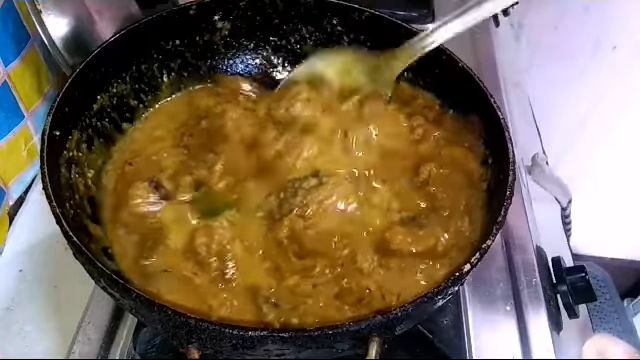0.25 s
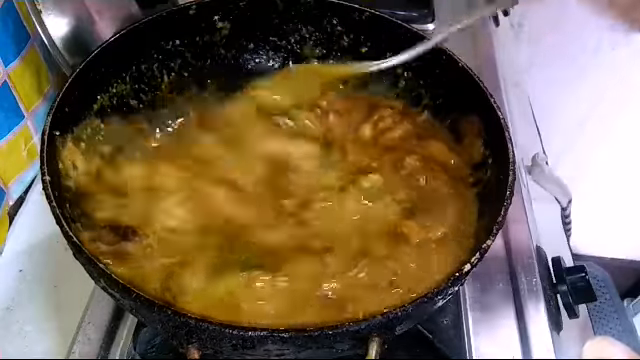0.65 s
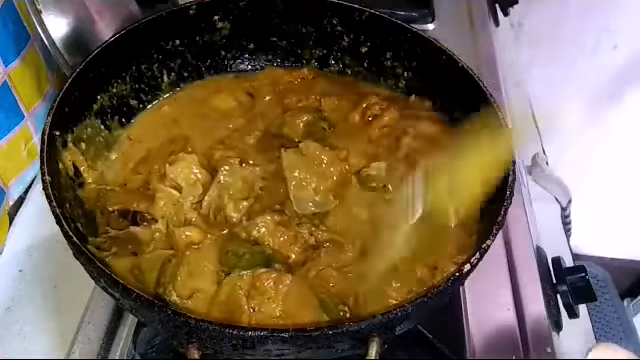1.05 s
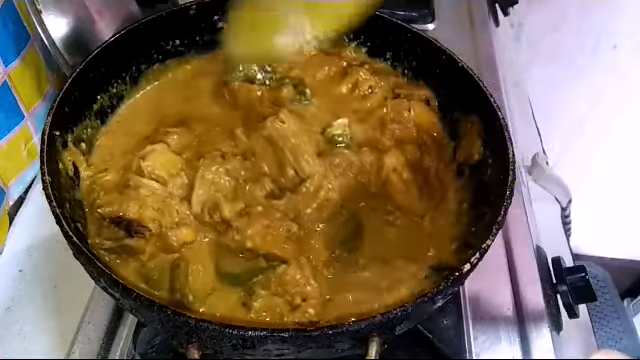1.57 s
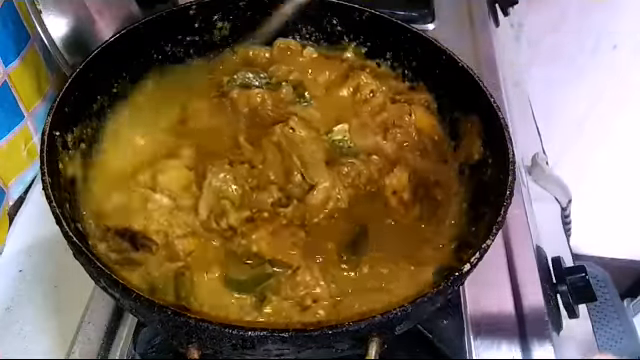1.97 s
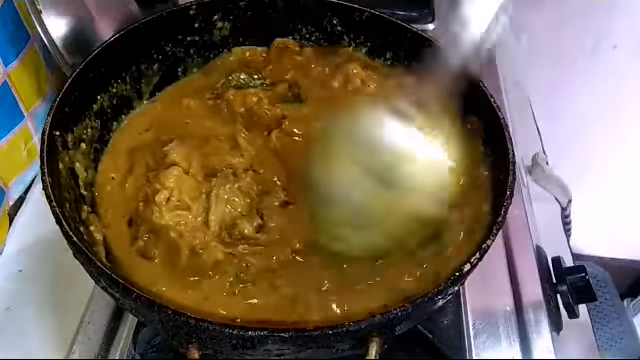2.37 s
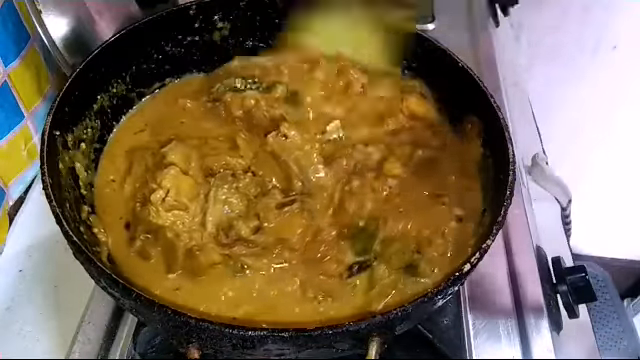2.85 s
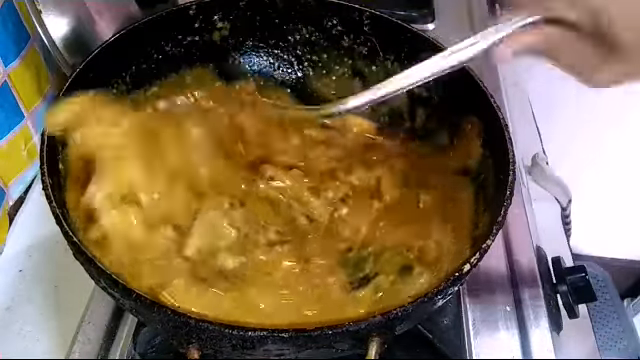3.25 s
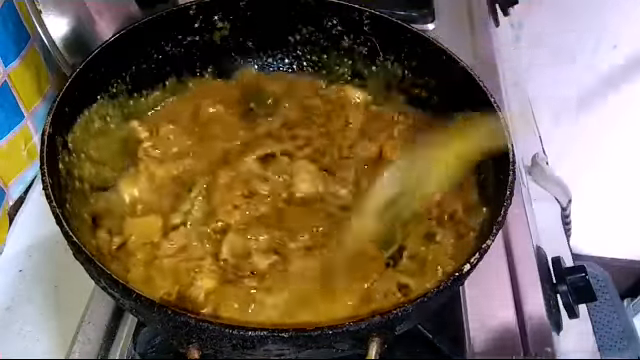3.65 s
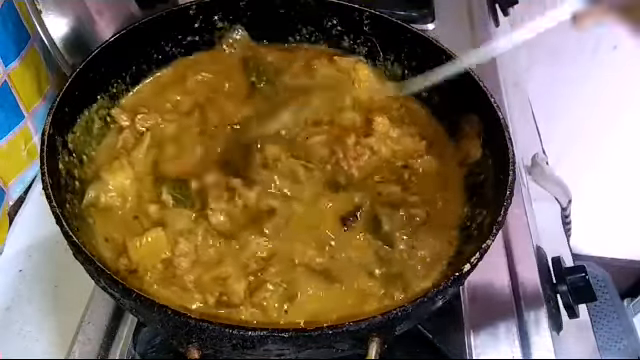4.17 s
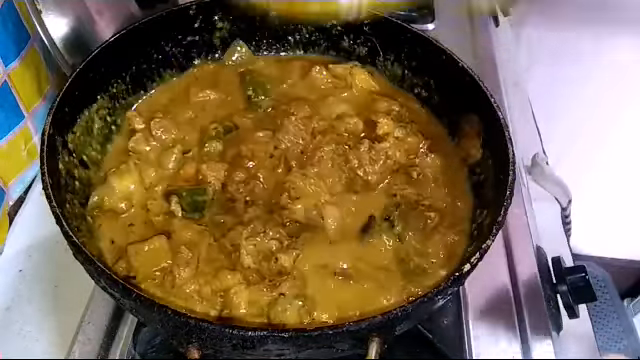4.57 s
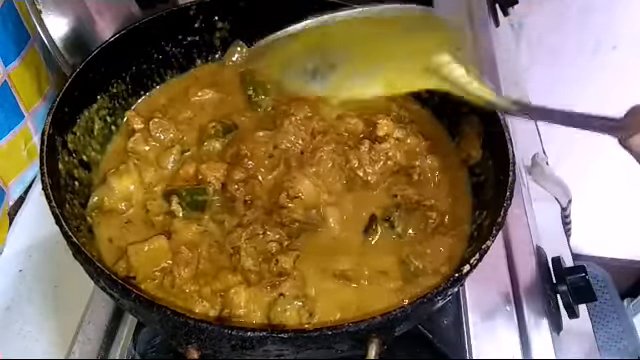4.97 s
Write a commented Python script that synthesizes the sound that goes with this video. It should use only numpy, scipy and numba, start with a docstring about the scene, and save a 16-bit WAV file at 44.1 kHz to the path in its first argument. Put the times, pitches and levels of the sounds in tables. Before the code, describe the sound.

A steel spoon stirs thick curry in a nonstick pan on a gas stove. A light clink comes first, then short bursts of gritty, wet scraping separated by squelches, plops and soft sizzling. A sharp slap lands in the gravy near four seconds, and two loud, clanging rim knocks close it. Heard close from above in a small, hard-walled kitchen with a short reverberation.

```python
"""Stirring thick curry on a gas stove

A steel spoon stirs thick curry in a nonstick pan, heard from just above in a small tiled kitchen.
Stick-slip friction drives the scrapes: each slip shakes the pan and rasps the edge; pressure squeezes gravy.
Air pockets ring as damped bubbles, steam fizzes as a dense swarm of them, and filtered noise is the flame.
Blows excite the modes of spoon, pan and stove; at the end the spoon is knocked twice on the rim."""
import sys
import numpy as np
from scipy import signal
from scipy.fft import rfft, irfft
from scipy.io import wavfile
from numba import njit

SR = 44100
rng = np.random.default_rng(int(sys.argv[2]) if len(sys.argv) > 2 else 0)


def inscribe(sig):
    """Save sig as 16-bit PCM at rate SR to the path in sys.argv[1].

    A 1-D sig is mono; a 2-D sig holds one channel per row.
    Samples are clipped to [-1, 1] before scaling.
    """
    pcm = np.round(np.clip(np.atleast_2d(sig).T, -1, 1) * 32767)
    wavfile.write(sys.argv[1], SR, pcm.astype(np.int16))


N = 230005

# modes of the pan: (frequency [Hz], relative level [dB])
PAN_MODES = [(452, -3.5), (628, 5), (756, 5.5), (962, 11), (1019, 7.5), (1190, -5), (1265, -5), (1325, -1),
             (1522, 1), (1998, -4), (4300, -6), (5230, -9.5)]


def undb(db):
    """Logarithmic levels: decibels become an amplitude gain."""
    return 10 ** (np.asarray(db) / 20)


def unit(x):
    """Power normalisation: scale a sound to rms 1."""
    return x / np.sqrt(np.mean(x ** 2))


def unit_energy(x):
    """Energy normalisation: scale a response to energy 1."""
    return x / np.sqrt(np.sum(x ** 2))


def curves(rows):
    """Linear interpolation: the columns of a timed table, one value per sample."""
    s, *columns = np.transpose(rows)
    return [np.interp(np.arange(N) / SR, s, c) for c in columns]


def through(x, response):
    """Linear filtering: convolve a sound with an impulse response."""
    return signal.oaconvolve(x, response)[:N]


def add(out, s, sound):
    """Superposition: mix a sound in at time s."""
    i = max(int(s * SR), 0)
    out[i:i + len(sound)] += sound[:max(N - i, 0)]


def colour(points, size=2048):
    """Minimum phase: folding the cepstrum gives a causal response with the given spectrum."""
    hz, db = np.transpose(points)
    bins_hz = np.arange(size // 2 + 1) * SR / size
    gain = undb(np.interp(np.log(bins_hz + 1), np.log(hz), db))
    cepstrum = irfft(np.log(gain))
    cepstrum[1:size // 2] *= 2
    cepstrum[size // 2 + 1:] = 0
    return unit_energy(irfft(np.exp(rfft(cepstrum))))


def fade(t, t60):
    """Exponential damping: 60 dB down after t60."""
    return np.exp(-np.log(1000) * t / t60)


def ring(modes):
    """Modal superposition: damped sines, neighbours swinging in opposite senses."""
    t = np.arange(SR // 2) / SR
    total = np.zeros(len(t))
    for k, (hz, db, t60) in enumerate(modes):
        total += (-1) ** k * undb(db) * fade(t, t60) * np.sin(2 * np.pi * hz * t)
    return unit_energy(total)


def pan_ring(t60):
    """Modal damping: all the pan's modes die away at one given rate."""
    return ring([(hz, db, t60) for hz, db in PAN_MODES])


def wander(rate):
    """Band-limited chance: smooth noise changing about rate times a second, spread near 1."""
    values = rng.standard_normal(N // 20)
    return 1.1 * np.interp(np.arange(N) / SR * rate, np.arange(len(values)), values)


def clicks(rate, spread_db):
    """Random impulse process: rate clicks a second on average, of scattered sizes, rms 1."""
    present = rng.random(N) < rate / SR
    sign = rng.choice([-1, 1], N)
    size_db = spread_db * np.minimum(rng.exponential(size=N), np.pi)
    return unit(present * sign * undb(size_db))


def bubble(hz, cycles, glide, onset_cycles=.5):
    """Cavity resonance: an air pocket rings, 60 dB down after some cycles, rising in pitch as it opens."""
    t = np.arange(int(SR * cycles / hz) + 2) / SR
    age = t * hz / cycles
    onset = 1 - np.exp(-(t * hz / onset_cycles) ** 2)
    return fade(age, 1) * onset * np.sin(2 * np.pi * hz * t * (1 + glide * age))


def froth(centre_hz, octaves, spread_db, cycles, count):
    """Incoherent sum: a swarm of bubbles of scattered time, pitch and size, rms 1."""
    out = np.zeros(N)
    draws = zip(rng.random(count), rng.standard_normal(count), rng.exponential(size=count))
    for when, pitch, size in draws:
        hz = min(centre_hz * 2 ** (octaves * pitch), SR / np.pi)
        gain = undb(spread_db * min(size, np.pi))
        add(out, when * N / SR, gain * bubble(hz, cycles, glide=0.073, onset_cycles=1.5))
    return unit(out)


@njit
def resonate(x, hz, width):
    """State-variable resonance: a band-pass whose centre may move, gain 1 at the centre."""
    y, band, low = np.empty(len(x)), 0., 0.
    for i in range(len(x)):
        g, k = np.tan(np.pi * hz[i] / SR), width / hz[i]
        v = (band + g * (x[i] + 1e-18 - low)) / (1 + g * (g + k))
        band, low, y[i] = 2 * v - band, low + 2 * g * v, k * v
    return y


def swell(start, rise, hold, release, range_db=26):
    """Pressure envelope: climbs range_db over the rise, holds, drops range_db over the release."""
    t = np.arange(N) / SR - start
    return undb(-range_db * (np.maximum(-t, 0) / rise + np.maximum(t - hold, 0) / release))


def burner():
    """Turbulent combustion: the flame flutters under the pan as low, coloured noise."""
    # flutter spectrum: (frequency [Hz], level [dB per Hz])
    flutter = [(20, -19), (45, -11.5), (70, 4), (97, 2.5), (125, -3.5), (145, -8.5), (200, -20.5),
               (350, -15.5), (700, -26), (2000, -56)]
    # strength of the flutter: (time [s], relative level [dB])
    flame = [(0, -75), (.13, -66), (.65, -65), (.98, -60.5), (1.5, -62), (1.8, -75), (2.85, -72),
             (3.85, -62.5), (4.35, -77), (4.67, -57), (4.8, -66)]
    level_db, = curves(flame)
    return through(rng.standard_normal(N), colour(flutter)) * undb(level_db - 1)


def gravy_levels(rise_s=.015, settle_s=.04, flare_db=11, flare_s=.25):
    """Surface cooling: a wave squelches while it moves; its sizzle flares, then sinks as the metal cools."""
    # gravy pushed over hot metal:
    # (start [s], length [s], relative sizzle level [dB], relative squelch level [dB])
    waves = [(0, .17, -66.5, -61), (.36, .3, -56, -60), (.74, .27, -62.5, -63.5), (1.2, .22, -64.5, -66),
             (1.43, .08, -52, -62), (1.52, .34, -58.5, -66), (1.97, .53, -58.5, -58), (3.08, .6, -55, -62),
             (3.7, .3, -69, -66), (4.06, .08, -59, -64), (4.28, .46, -59.5, -63), (4.77, .45, -61, -61)]
    t = np.arange(N) / SR
    steam, wet = undb(-76.5), undb(-69.5)  # gravy at rest
    for s, length, sizzle, squelch in waves:
        age = np.maximum(t - s, 0)
        settling = np.exp(-np.maximum(age - length, 0) / settle_s)
        moving = (1 - np.exp(-age / rise_s)) * settling
        cooling_db = flare_db * (1 - np.exp(-age / flare_s))
        steam = np.hypot(steam, moving * undb(sizzle - cooling_db))
        wet = np.hypot(wet, moving * undb(squelch))
    return 20 * np.log10([steam, wet])


def simmering(squelch_db=-3, sizzle_db=-2.5, cluster_db=2.0, spit_db=-8):
    """Bubble acoustics: low pockets squelch in clusters; steam fizzes and spits on bare metal."""
    # fizz spectrum: (frequency [Hz], level [dB per Hz])
    sizzle = [(1500, 4), (2400, 2.5), (3200, -6.5), (4300, 1.5), (5300, 2.5), (6500, -3.5), (8000, -2),
              (10000, -12), (14000, -48)]
    steam_db, wet_db = gravy_levels()
    pockets = froth(centre_hz=930, octaves=0.33, spread_db=2.3, cycles=22, count=950)
    small = froth(centre_hz=1880, octaves=0.22, spread_db=3.2, cycles=30, count=700)
    pockets = pockets + undb(-7.5) * small
    swarm = froth(centre_hz=4580, octaves=0.633, spread_db=2, cycles=29.4, count=8000)
    fizz = unit(through(swarm, colour(sizzle)))
    spits = froth(centre_hz=5100, octaves=.12, spread_db=3, cycles=70, count=260)
    steam = (fizz + undb(spit_db) * spits) * undb(steam_db + sizzle_db + 2 * wander(rate=22))
    return pockets * undb(wet_db + squelch_db + cluster_db * wander(rate=28)) + steam


def plopping(snap_db=-5):
    """Damped cavity resonance: pockets burst with a snap and a ring, a few tiny high ones spitting like fizz."""
    # pockets opening, and at 4.056 s the spoon slapping down close by:
    # (time [s], relative peak level [dB], starting pitch [Hz], ring length [cycles])
    bursts = [(0.033, -42.5, 834, 17), (0.917, -35.5, 1440, 19), (1.422, -37, 612, 37),
              (1.533, -35, 4960, 33), (2.65, -47, 910, 20), (2.794, -50, 5180, 130), (2.809, -50, 2010, 26),
              (2.897, -48, 600, 25), (3.076, -34, 2010, 45), (3.333, -45, 990, 38),
              (3.617, -42.5, 1035, 32), (3.67, -32.5, 947, 11), (3.708, -44.5, 860, 19),
              (3.733, -46, 5700, 90), (3.896, -49, 915, 53), (3.905, -47, 2020, 38), (3.947, -53, 1890, 36),
              (4.006, -43, 1500, 16), (4.02, -40, 1950, 19), (4.0562, -18, 1620, 6.4),
              (4.245, -50, 900, 24), (4.302, -46, 1000, 24), (4.37, -45, 1950, 30), (4.39, -45, 800, 22),
              (4.435, -38, 807, 20), (4.613, -39, 755, 17), (4.646, -46, 2300, 45),
              (4.791, -39.5, 820, 15.6), (4.848, -43, 840, 24)]
    out = np.zeros(N)
    for s, db, hz, cycles in bursts:
        add(out, s, undb(db) * bubble(hz, cycles, glide=0.05))
        add(out, s, undb(db + snap_db) * bubble(1.55 * hz, cycles=3.6, glide=0.12))
    return out


def chatter(t60, tail_db, bite_t60=0.016):
    """Contact noise: a few milliseconds of hard contact, then a dense, quickly dying buzz."""
    t = np.arange(SR // 4) / SR
    bite = unit_energy(rng.standard_normal(len(t)) * fade(t, bite_t60))
    buzz = unit_energy(rng.standard_normal(len(t)) * fade(t, t60))
    return unit_energy(bite + undb(tail_db) * buzz)


def bounces(span_s=.06, count=12):
    """Repeated impact: one blow, then the spoon skips on with lighter, unevenly timed touches."""
    out = np.zeros(SR // 4)
    when = rng.random(count)
    touch = (when * span_s * SR).astype(int)
    out[touch] = .35 * np.exp(-when) * rng.choice([-1, 1], count)
    out[0] = 1
    return unit_energy(out)


def knocking(body_db=-2, pan_db=-4, clink_db=-1, spoon_db=-3, thud_db=-5, rim_db=-3):
    """Impact excitation: a blow rattles spoon on pan, rings both and rocks the pan on its grate."""
    # steel on pan: (time [s], then relative levels [dB] of pan body, contact clink, spoon ring,
    # stove thud, rattle, rim ring)
    blows = [(0.197, -12, -8, -4.5, -12, 8, -17), (2.217, -15, -21, -30, -42, 2, -32),
             (2.256, -17, -45, -47, -41, 2, -30), (4.057, -19, -27, -38, -42, -2, -42),
             (4.9255, -1.5, -2.5, -14, -8, 5, -6), (4.955, -4, -9, -17, -11, 15, -11),
             (4.9605, -9, -16, -30, -20, -2, -14), (4.969, -10, -20, -30, -20, 0, -20),
             (4.9915, -5.5, -12, -22, -7, 7, -16), (5.102, -1, -4.5, -37, -9, 0, -7.5),
             (5.113, -10, -19, -37, -22, 2, -17), (5.127, -11, -18, -37, -20, -4, -22),
             (5.15, -8, -21, -25.5, -10, 5, -18), (5.168, -12, -26, -37, -16, 0, -26)]
    # contact spectra of body and clink: (frequency [Hz], level [dB per Hz])
    body_colour = [(40, -10), (150, -22), (350, -11), (550, -10), (750, 2.5), (1100, 2), (1600, 0),
                   (1880, -16), (2250, -10), (2550, -16), (3000, -11), (3500, -17), (4200, -17),
                   (8000, -57)]
    clink_colour = [(500, -15.5), (2800, -19), (3500, -27), (4300, -5.5), (5300, -2), (6300, -6.5),
                    (7500, -21), (9500, -22), (12000, -28), (14000, -39)]
    # modes of spoon, spoon-choked rim, and pan on grate: (frequency [Hz], relative level [dB], t60 [s])
    spoon_modes = [(1453, -13, .12), (1660, -16, .05), (2530, -10, .09), (2772, -9, .09), (2950, -11, .07),
                   (3950, -17, .07), (4400, -12, .05), (5001, 1, .13), (5071, -1, .11), (5230, -4, .11),
                   (5329, -6, .07), (6008, -3, .05), (6153, -6, .05), (6471, -14, .08), (6853, -12, .1),
                   (7950, -2, .1), (7985, -9, .07), (10990, -17, .09), (11950, -21, .09), (12560, -24, .1),
                   (13450, -23, .09)]
    rim_modes = [(1540, -11, .1), (2180, -15, .09), (2320, -14, .1), (2902, -15, .12), (4172, -5, .08),
                 (4300, 0, .09), (4689, -7, .08), (5195, -2, .08), (5330, 3, .045), (5650, 1, .03),
                 (5830, -1, .03), (6300, -6, .03)]
    stove_modes = [(96, 2.5, 0.88), (144, 2, 0.26), (200.5, 1, 0.19), (300, 1, .16), (452, 2.5, .22)]
    push, clink, strike, spoon, rock, rim = np.zeros((6, N))
    for s, body, contact, steel, thud, rattle, edge in blows:
        add(push, s, undb(body) * chatter(t60=0.15, tail_db=rattle))
        add(clink, s, undb(contact) * chatter(t60=0.14, tail_db=rattle - 8.5))
        add(strike, s, undb([body]))
        add(spoon, s, undb(steel) * bounces())
        add(rock, s, undb([thud]))
        add(rim, s, undb([edge]))
    out = undb(body_db) * through(push, colour(body_colour))
    out += undb(clink_db) * through(clink, colour(clink_colour))
    out += undb(pan_db) * through(strike, pan_ring(.24))
    out += undb(spoon_db) * through(spoon, ring(spoon_modes))
    out += undb(rim_db) * through(rim, ring(rim_modes))
    return out + undb(thud_db) * through(rock, ring(stove_modes))


def spoon_forces(dulling_db_per_s=45):
    """Contact forces: pressure on the pan, load on its floor and bite of the edge."""
    # strokes along the floor: (full pressure at [s], rise [s], hold [s], release [s],
    # relative level [dB], relative floor groan [dB], relative edge rasp [dB])
    strokes = [(.352, .02, .06, .3, -49.5, -56, -53.5), (1.405, .1, .065, .1, -45, -61, -64),
               (2.085, .15, .07, .2, -55, -54, -56), (2.222, .02, .225, .085, -48, -50, -50.5),
               (2.897, .015, .03, .2, -57, -68, -63), (3.07, .07, .12, .26, -55.5, -63, -58),
               (4.055, .08, .05, .07, -58, -74, -53.5)]
    # the spoon catches and shoves:
    # (middle [s], length [s], relative shove [dB], relative groan [dB], relative rasp [dB])
    catches = [(.335, .04, -62, -49, -66), (.362, .04, -43.5, -38.5, -60), (.414, .035, -44, -53, -50),
               (.468, .03, -50, -62, -64), (1.355, .055, -57, -54, -56), (1.396, .04, -44, -43, -68),
               (1.443, .055, -39, -56, -61), (1.485, .05, -47, -64, -56), (2.108, .08, -50, -44, -53),
               (2.167, .035, -50, -52, -57), (2.228, .04, -43, -40, -44), (2.275, .06, -49, -56, -47),
               (2.31, .06, -47, -47, -53), (2.385, .07, -45, -43, -53), (2.43, .05, -49, -51, -62),
               (2.468, .05, -54, -42, -66), (2.985, .08, -66, -43, -57), (3.065, .1, -57, -43, -56),
               (3.127, .04, -52, -47, -48), (3.21, .04, -56, -68, -66)]
    t = np.arange(N) / SR
    gliding, caught = np.zeros((2, 3, N))
    for s, rise, hold, release, db, load, rasp in strokes:
        effort = swell(s, rise, hold, release)
        gliding[0] += effort * undb(db)
        gliding[1] += effort * undb(load)
        # gravy creeps under the edge and quiets it
        gliding[2] += effort * undb(rasp - dulling_db_per_s * np.maximum(t - s, 0))
    for s, length, *levels in catches:
        for force, db in zip(caught, levels):
            add(force, s - length / 2, undb(db) * np.hanning(int(length * SR)))
    return np.hypot(gliding, caught)


def scraping(ring_db=-6, groan_db=-5, rasp_db=-1, body_db=-7, slosh_db=-8, hollow_db=-5, rock_db=-16):
    """Stick-slip friction: each slip shakes the pan and rasps the edge, while the pressure squeezes gravy."""
    # spectra of pan shake, edge rasp and rocking grate: (frequency [Hz], level [dB per Hz])
    scrape = [(40, -63), (120, -34), (200, -17.5), (340, -14), (600, -1.5), (800, -9), (1250, 2.5),
              (1650, -5), (2100, -.5), (2600, -14), (3300, -18), (6000, -85.5)]
    rasp_colour = [(700, -13), (1400, -6), (2000, 9), (2500, 4.5), (3200, -7.5), (4000, 0), (5000, 1),
                   (5900, 0), (7000, -9), (9000, -15), (11000, -38), (14000, -66)]
    grate = [(60, -23.5), (130, -11), (250, 3), (330, 1.5), (600, -30), (3000, -90)]
    # resonance of the hollow between spoon and gravy, lower as it opens: (time [s], frequency [Hz])
    hollow_pitch = [(.35, 1190), (.43, 1350), (.49, 1050), (1.39, 1200), (1.44, 1100), (1.47, 900),
                    (1.53, 800), (2.05, 1230), (2.126, 1050), (2.258, 1350), (2.34, 1300), (2.424, 980),
                    (2.95, 900), (3.126, 1250), (3.25, 1000)]
    # a stroke over dried crust: (full pressure at [s], rise [s], hold [s], release [s], level [dB])
    dried_crust = (3.0, .04, .13, .05, -67)
    # the edge grabs and lets go unevenly
    press, groan, edge = spoon_forces() * undb(1.74 * wander(rate=90))
    slips = clicks(rate=1600, spread_db=3)
    grit = unit(slips + clicks(rate=5400, spread_db=5.5))
    shake = undb(body_db) * through(slips * press, colour(scrape))
    # the slips also ring the changing hollow under the spoon
    hollow_hz, = curves(hollow_pitch)
    narrow = resonate(slips, hollow_hz, 260.)
    hollow = undb(hollow_db) * press * unit(resonate(narrow, hollow_hz, 900.))
    # the pressed spoon damps the pan
    damped = unit_energy(through(pan_ring(.11), colour(scrape)))
    modes = undb(ring_db) * through(slips * press, damped)
    # friction keeps the lowest mode groaning when the spoon bears down on the middle
    groan_hz = PAN_MODES[0][0] * (1 + .06 * wander(rate=160))
    phase = 2 * np.pi * np.cumsum(groan_hz) / SR
    shudder = undb(1.5 * wander(rate=53))
    floor = undb(groan_db) * groan * unit(np.sin(phase) * shudder)
    # and the same force rocks the pan on its grate
    floor += undb(rock_db) * through(slips * groan, colour(grate))
    squeezed = froth(centre_hz=1123, octaves=0.42, spread_db=2, cycles=40, count=1300)
    slosh = undb(slosh_db) * press * squeezed
    rasp = undb(rasp_db) * through(grit * edge, colour(rasp_colour))
    *timing, crust_db = dried_crust
    crust = grit * swell(*timing) * undb(crust_db)
    return shake + hollow + modes + floor + slosh + rasp + crust


def scratching():
    """Selective resonance: friction rings single narrow resonances as the spoon turns and travels."""
    # resonances of spoon and pan:
    # (middle [s], length [s], frequency [Hz], width of each filter pass [Hz], relative level [dB])
    scratches = [(.378, .04, 1330, 200, -46), (.415, .03, 2050, 300, -50), (.425, .05, 2750, 400, -54),
                 (.425, .05, 1300, 200, -47), (.475, .035, 950, 100, -46), (.53, .09, 2200, 700, -57),
                 (1.368, .035, 1950, 130, -52), (1.405, .05, 1200, 250, -46), (1.405, .04, 2000, 200, -54),
                 (1.42, .12, 5200, 900, -58), (1.44, .035, 2050, 170, -52), (1.452, .06, 1400, 150, -47),
                 (1.46, .11, 625, 70, -44.5), (1.488, .04, 2120, 200, -55), (2.072, .06, 1950, 200, -52),
                 (2.1, .14, 590, 70, -56), (2.125, .15, 930, 80, -54.5), (2.125, .13, 1365, 90, -54.5),
                 (2.223, .03, 5750, 600, -48), (2.235, .04, 1600, 400, -48), (2.275, .08, 1990, 150, -45),
                 (2.28, .09, 2480, 200, -54), (2.275, .06, 2870, 250, -56), (2.255, .09, 3850, 800, -52),
                 (2.29, .13, 5800, 800, -56), (2.29, .12, 930, 90, -51), (2.365, .08, 1200, 140, -47),
                 (2.41, .13, 690, 150, -46), (2.445, .1, 1410, 90, -48), (2.45, .05, 2320, 220, -56),
                 (2.925, .08, 610, 80, -58), (2.975, .06, 5600, 1200, -62), (3.055, .06, 4900, 500, -62),
                 (3.058, .045, 4230, 250, -60), (3.066, .05, 1900, 200, -56), (3.13, .04, 4260, 250, -51),
                 (3.135, .04, 2200, 700, -55), (3.13, .035, 1100, 200, -46), (3.175, .11, 950, 80, -52)]
    out = np.zeros(N)
    for s, length, hz, width, db in scratches:
        n = int(length * SR)
        centre = np.full(n, float(hz))
        grit = rng.standard_normal(n)
        tone = resonate(resonate(grit, centre, float(width)), centre, float(width))
        add(out, s - length / 2, undb(db) * unit(tone * np.hanning(n)))
    return out


def surging():
    """Air entrainment: heaved gravy folds over and swallows large, round air pockets."""
    # the heave: (full at [s], rise [s], hold [s], release [s], relative level [dB])
    heave = (1.43, .06, .055, .07, -45)
    *timing, db = heave
    pockets = froth(centre_hz=900, octaves=.28, spread_db=1.2, cycles=35, count=2600)
    return undb(db) * swell(*timing) * pockets


def squeaking(waver=.045, overtone_db=-18):
    """Friction self-oscillation: for a few cycles the slips fall into step and make a rough tone."""
    # short squeaks of the juddering edge: (start [s], length [s], mean pitch [Hz], relative level [dB])
    squeaks = [(2.996, .022, 1045, -46), (3.036, .028, 1110, -44), (3.117, .027, 1270, -39.5)]
    out = np.zeros(N)
    for s, length, hz, db in squeaks:
        n = int(length * SR)
        phase = 2 * np.pi * np.cumsum(hz * (1 + waver * wander(rate=600)[:n])) / SR
        tone = np.sin(phase) + undb(overtone_db) * np.sin(2 * phase)
        add(out, s, undb(db) * unit(np.hanning(n) ** .5 * tone))
    return out


def kitchen(x, t60=0.34, wet_db=-2, build_s=0.002, side_db=-11):
    """Diffuse reverberation: close hard walls return a short dense wash, differing mostly in the treble."""
    # spectrum of the difference between the two channels: (frequency [Hz], level [dB per Hz])
    difference = [(100, -7), (1000, -13), (2000, -8), (5000, -4.5), (8500, 7), (13000, -7.5)]
    t = np.arange(SR // 2) / SR
    shape = fade(t, t60) * (1 - np.exp(-(t / build_s) ** 2))
    mid = unit_energy(rng.standard_normal(len(t)) * shape)
    side = unit_energy(rng.standard_normal(len(t)) * shape)
    side = undb(side_db) * signal.oaconvolve(side, colour(difference))
    opposite = np.array([[1], [-1]])
    return x + undb(wet_db) * (through(x, mid) + opposite * through(x, side))


def scene(plop_wet_db=-3):
    """Direct and reverberant sound: the plops face straight up and are drier; the flame has no echo."""
    plops = plopping()
    share = undb(plop_wet_db)
    spoon = scraping() + scratching() + squeaking() + knocking()
    gravy = surging() + simmering() + share * plops
    return kitchen(spoon + gravy) + (1 - share) * plops + burner()


def record(dry, low_hz=40, top_hz=14400):
    """Band limiting: the microphone loses the lowest rumble and its top is cut steeply."""
    dry = signal.sosfilt(signal.butter(2, low_hz, "high", fs=SR, output="sos"), dry)
    return signal.sosfilt(signal.ellip(10, .2, 70, top_hz, fs=SR, output="sos"), dry)


dry = scene()
out = record(dry)
inscribe(out)
```